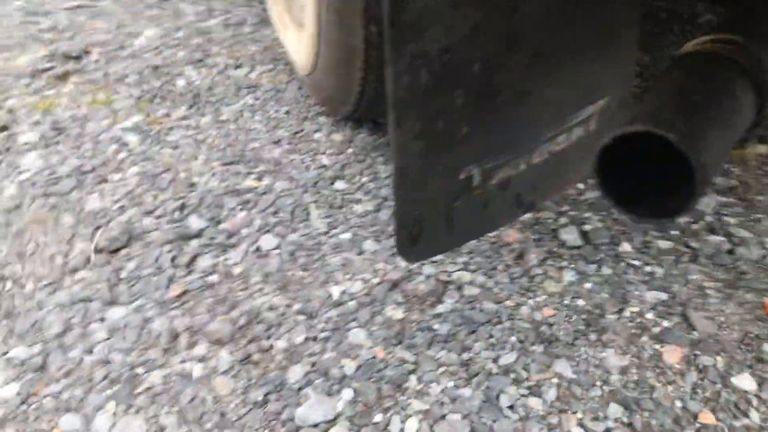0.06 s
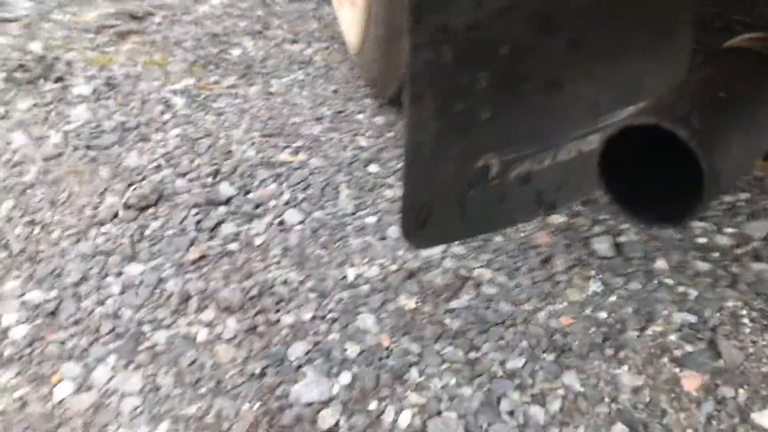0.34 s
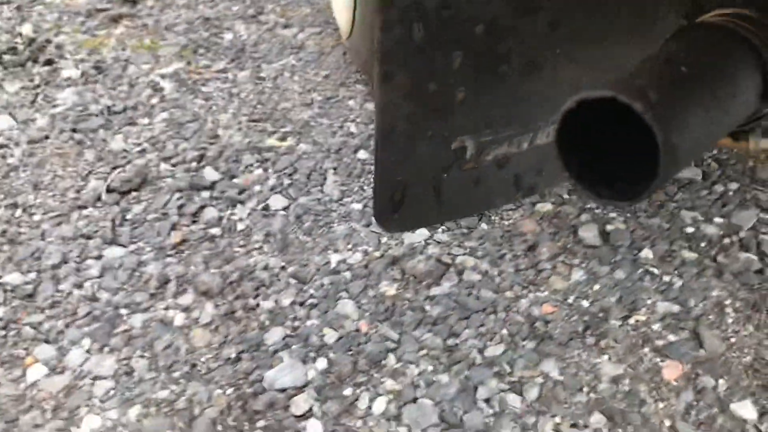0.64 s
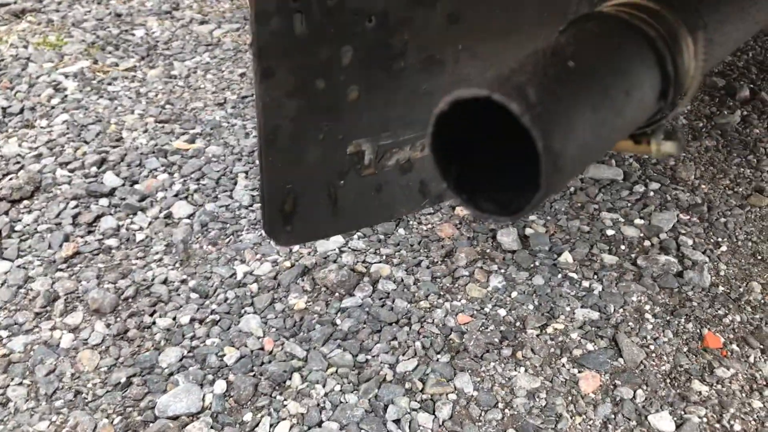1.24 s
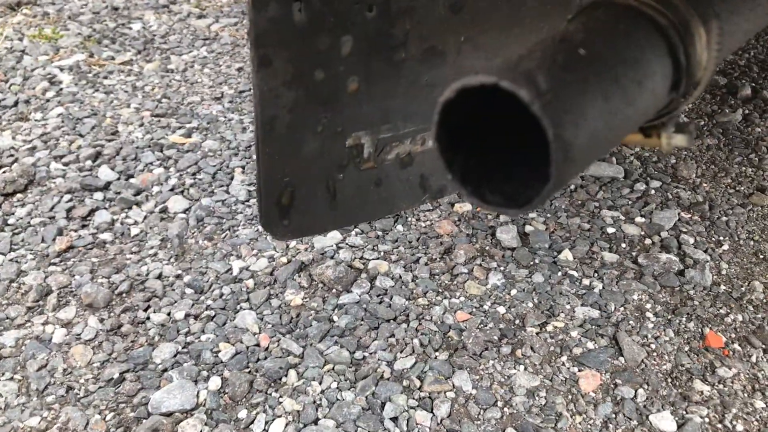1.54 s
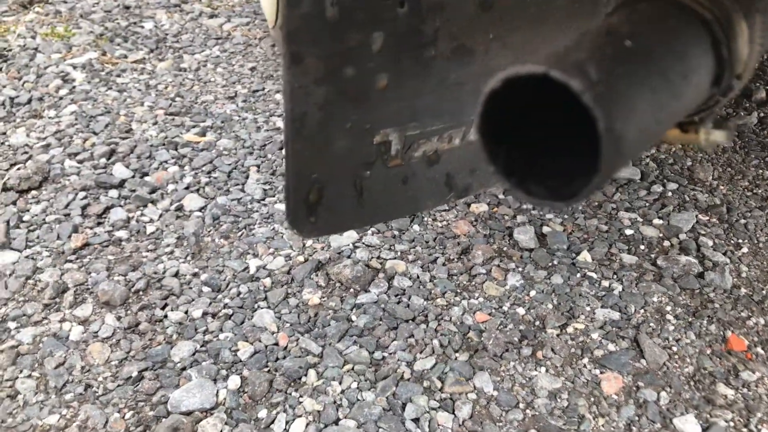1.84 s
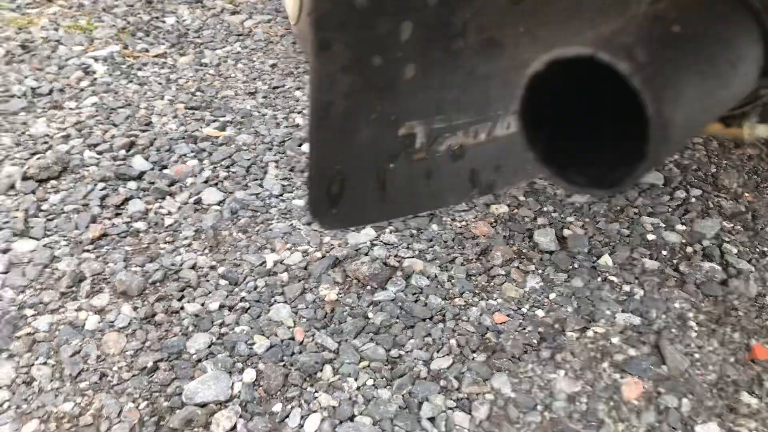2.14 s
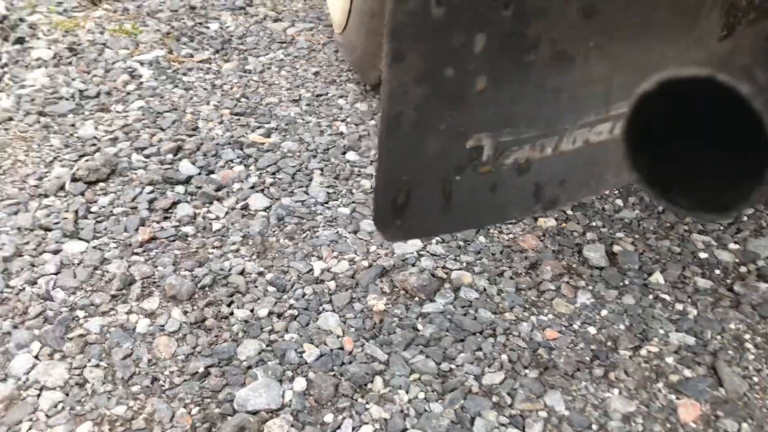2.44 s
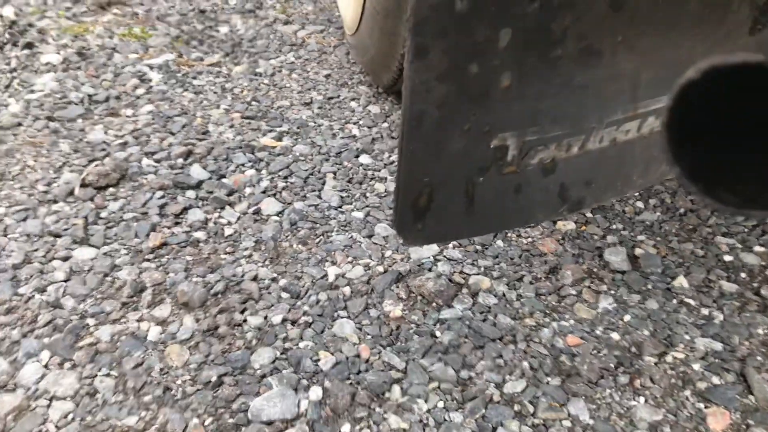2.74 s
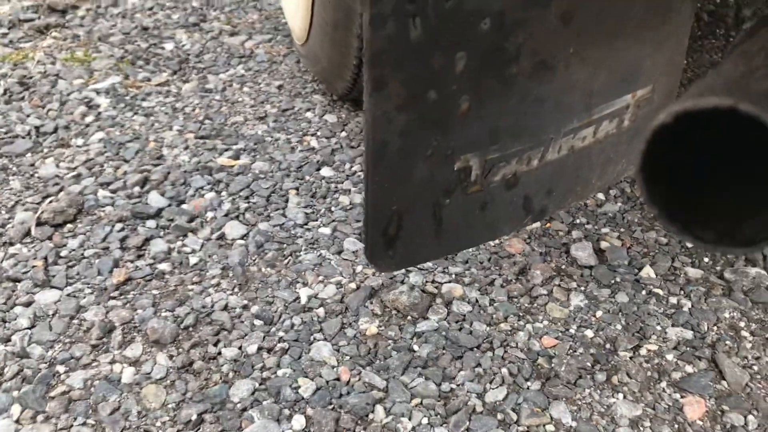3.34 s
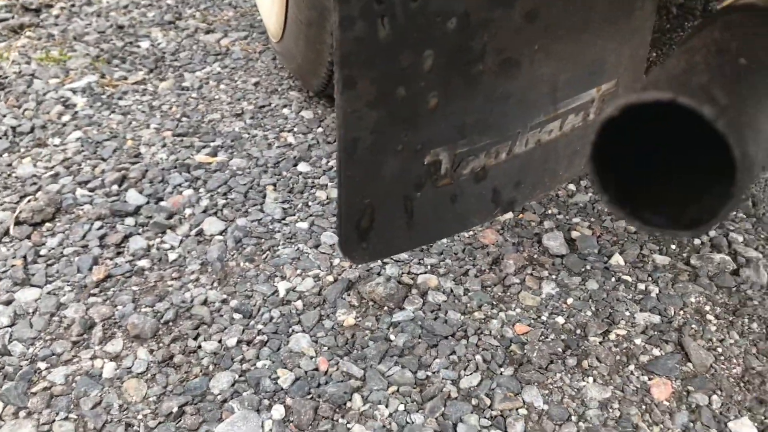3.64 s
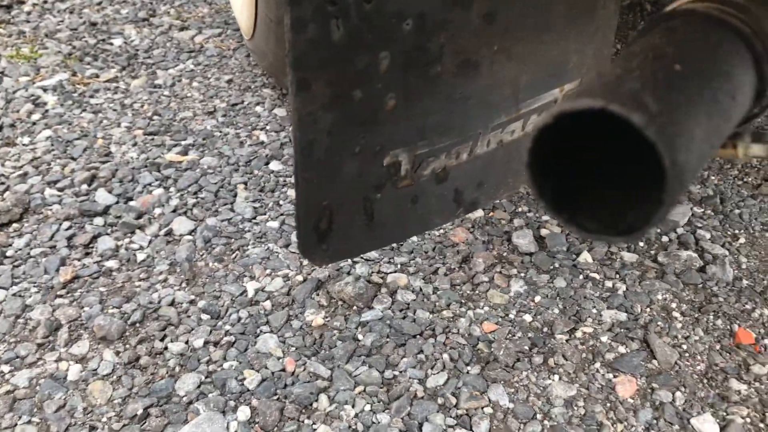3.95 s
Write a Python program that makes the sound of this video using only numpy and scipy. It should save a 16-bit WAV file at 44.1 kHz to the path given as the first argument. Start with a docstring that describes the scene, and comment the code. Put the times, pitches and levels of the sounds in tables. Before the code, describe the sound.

Uneven popping from an idling two-stroke car exhaust, close and dry in the open air. Spluttering gas blows on the microphone for about a second, then sharper cracks ring the pipe with deep thumps, a low drone and light hiss.

```python
"""Two-stroke idle at the tailpipe

Outdoors, the microphone a hand's width from the tailpipe of a small, unevenly idling two-stroke car.
For the first second or so it sits in the exhaust stream, which buffets it and splutters.
Each firing cracks and rings the pipe; once clear of the stream, puffs of gas thump the microphone
just after the firings. In between, the silencer drones over a background hiss."""
import sys
import numpy as np
from scipy.fft import rfft, irfft, next_fast_len
from scipy.io import wavfile
from scipy.ndimage import uniform_filter1d, map_coordinates

SR = 44100
rng = np.random.default_rng(int(sys.argv[2]) if len(sys.argv) > 2 else 0)


def put_to_file(sound):
    """Save the sound as 16-bit audio at rate SR, in the file named by the first command-line argument."""
    columns = np.atleast_2d(sound).T  # one column per channel
    safe = np.clip(columns, -1, 1)
    whole_steps = np.round(safe * 32767)
    wavfile.write(sys.argv[1], SR, whole_steps.astype(np.int16))


N = 176400

# tailpipe resonances (frequency [Hz], width [Hz], gain [dB])
PIPE_MODES = [(303, 22, -3), (450, 30, -3), (505, 25, -1), (616, 32, 2), (792, 30, -11), (948, 50, 3),
              (1082, 34, 6), (1245, 38, -2), (1396, 32, -2), (1556, 34, -2), (1705, 32, -3),
              (2630, 140, -7), (2950, 80, -11), (4020, 70, -6), (4360, 90, -6)]
PIPE_TOP_HZ, SILENCER_TOP_HZ = 1750, 260  # each is muffled above this


def amp(db):
    """Decibels to amplitude."""
    return 10 ** (np.asarray(db) / 20)


def unit(x):
    """x scaled to rms 1."""
    return x / np.sqrt(np.mean(x ** 2) + 1e-20)


def curve(rows):
    """One value per sample from (time [s], value) rows."""
    return np.interp(np.arange(N) / SR, *np.transpose(rows))


def wobble(rate):
    """A smooth random curve, rate knots a second."""
    return map_coordinates(rng.standard_normal(4096), [np.arange(N) * rate / SR], mode="wrap")


def grid():
    """Frequencies [Hz] at which filter responses are given."""
    return np.fft.rfftfreq(2 * next_fast_len(N // 2 + SR // 4), 1 / SR)


def filtered(x, response):
    """x through a response on the frequency grid."""
    return irfft(rfft(x, 2 * len(response) - 2) * response)[:N]


def colour(points):
    """Causal response of unit power, shaped by (frequency [Hz], gain [dB]) points."""
    hz, db = np.transpose(points)
    gain = amp(np.interp(np.log(grid() + 1), np.log(hz), db))
    cepstrum = irfft(np.log(gain))
    half = len(cepstrum) // 2
    h = np.exp(rfft(np.r_[cepstrum[0], 2 * cepstrum[1:half]], len(cepstrum)))  # minimum phase
    return h / np.sqrt(np.mean(abs(h) ** 2))


def resonances(modes, top_hz):
    """Unit-power response of (frequency [Hz], width [Hz], gain [dB]) modes, muffled above top_hz."""
    f = grid()
    h = sum(amp(db) * 1j * f * width / (hz * hz - f * f + 1j * f * width) for hz, width, db in modes)
    h = h / (1 + np.sqrt(2) * 1j * f / top_hz - (f / top_hz) ** 2)
    return h / np.sqrt(np.mean(abs(h) ** 2))


def noise(response):
    """Noise of rms 1 with that response."""
    return unit(filtered(rng.standard_normal(N), response))


def even(x):
    """A narrow-band rumble at rms 1, its chance swells partly evened out."""
    power = np.abs(uniform_filter1d(x * x, size=1800)) + 1e-9
    return unit(x / power ** 0.16)


def add(track, start_s, x):
    """Mix x into the track at start_s."""
    part = track[max(round(start_s * SR), 0):][:len(x)]
    part += x[:len(part)]


def exhaust_stream(clear_s=1.242, fade_s=0.023):
    """The stream buffets the microphone until clear_s, and splutters more the harder it blows."""
    # strength of the stream at the microphone (time [s], level [dB])
    strength = [(0, -19), (.04, -16), (.09, -12), (.125, -15), (.17, -10), (.21, -15), (.26, -18),
                (.32, -16), (.36, -18), (.45, -12), (.51, -18), (.582, -16), (.65, -22), (.70, -19),
                (.79, -21), (.86, -17), (.92, -21), (.95, -27), (1.2, -30)]
    # spectrum of the low buffeting (frequency [Hz], gain [dB])
    buffet_spectrum = [(20, -15), (55, 5), (100, 1.5), (200, -1), (450, -4), (900, -14), (1500, -31),
                       (3000, -64), (6000, -65)]
    # spectrum of the splutter (frequency [Hz], gain [dB])
    splutter_spectrum = [(100, -10), (500, 10), (1100, 8), (2200, -1.5), (3500, -12.5), (5000, -23),
                         (8000, -36), (16000, -67)]
    # the sharpest eddies, heard as spits (time [s], level [dB])
    spits = [(.029, -15), (.043, -11), (.107, -7), (.133, -13), (.153, -12), (.169, -9), (.180, -11),
             (.306, -15), (.317, -14), (.369, -17), (.397, -14), (.415, -15), (.434, -8), (.474, -11),
             (.573, -14), (.586, -15), (.614, -19), (.692, -19), (.744, -15), (.763, -18), (.815, -16),
             (.858, -16), (.902, -19), (.917, -19)]
    strength_db, t = curve(strength), np.arange(N) / SR
    peak_db = strength_db.max()
    eddy = wobble(260)
    gusts = unit(amp(2.5 * eddy)) * rng.standard_normal(N)
    buffet = filtered(gusts, colour(buffet_spectrum)) * amp(strength_db + 1.5)
    splutter_db = peak_db - 7.5 + 1.56 * (strength_db - peak_db)
    spray = unit(amp(4.8 * (eddy + wobble(900)))) * amp(splutter_db)
    spit = np.exp(-t[:SR // 20] / 0.002)
    for start_s, db in spits:
        add(spray, start_s, amp(db + 3) * spit)
    splutter = filtered(spray * rng.standard_normal(N), colour(splutter_spectrum))
    return (buffet + splutter) * np.clip((clear_s - t) / fade_s, 0, 1)


def silencer_drone(strokes):
    """The strokes pump the silencer, which drones at its low resonances."""
    # silencer resonances (frequency [Hz], width [Hz], gain [dB])
    modes = [(56, 24, -1), (78, 26, 0), (102, 22, -2), (150, 30, -8), (235, 50, -17)]
    # loudness of the drone (time [s], level [dB])
    level = [(0, -29.5), (1.0, -20), (1.16, -20), (1.23, -36), (1.33, -21.5), (1.45, -24), (2.0, -19),
             (2.5, -21.5), (2.65, -19.5), (2.97, -33), (3.08, -22.5), (3.24, -23.5), (3.5, -16),
             (3.66, -33), (4, -6)]
    return amp(curve(level)) * even(filtered(strokes, resonances(modes, SILENCER_TOP_HZ)))


def pipe_boom(strokes, hz=170, width_hz=24):
    """The strokes set the pipe's lowest mode booming."""
    # loudness of the boom (time [s], level [dB])
    level = [(0, -34.5), (1.0, -35.5), (1.28, -32), (1.45, -26), (1.65, -31.5), (2.1, -39), (2.33, -24),
             (2.52, -18), (2.66, -32.5), (2.97, -35), (3.12, -39), (3.4, -59), (3.7, -31), (3.79, -17.5),
             (3.88, -32), (4, -50)]
    mode = resonances([(hz, width_hz, 0)], SILENCER_TOP_HZ)
    return amp(curve(level)) * even(filtered(strokes, mode))


def gas_flow(pulsing, top_hz=556):
    """Slow, pulsing gas rings mostly the pipe's lower modes."""
    # gas flowing through the pipe (time [s], level [dB])
    level = [(0, -59.5), (.95, -49.5), (1.14, -35.5), (1.27, -35.5), (1.42, -32), (1.65, -31.5), (2.0, -25),
             (2.45, -46), (2.62, -26), (2.87, -45), (2.97, -31), (3.12, -25.5), (3.22, -31), (3.53, -26),
             (3.7, -24), (4, -30)]
    pipe = resonances(PIPE_MODES, PIPE_TOP_HZ) / (1 + 1j * grid() / top_hz)
    return amp(curve(level) - 5) * unit(filtered(pulsing * rng.standard_normal(N), pipe))


def background_hiss(pulsing):
    """A hiss behind the engine, pulsing with the strokes."""
    # the hiss as heard, ducked during the buffeting and after loud thumps (time [s], level [dB])
    heard_level = [(0, -65), (1.0, -48), (1.27, -44.5), (1.6, -40.5), (2.0, -38.5), (2.4, -37),
                   (2.65, -37.5), (2.8, -39.5), (2.98, -40.5), (3.2, -39), (3.5, -41), (3.7, -37), (4, -35)]
    # spectrum of the hiss (frequency [Hz], gain [dB])
    spectrum = [(100, -6), (450, 18), (800, -13), (1600, -36), (2100, 0), (2700, -1), (3400, -4.5),
                (4300, -6.5), (5500, -11.5), (8000, -16), (10500, -20.5), (16000, -22)]
    return amp(curve(heard_level)) * pulsing * noise(colour(spectrum))


def unfired_strokes(strokes_per_s=52, rate_scatter=0.14, level_scatter_db=6, pulse_depth=0.25):
    """Strokes that fail to fire pump the silencer and push pulsing gas through the pipe."""
    phase = np.cumsum(strokes_per_s * (1 + rate_scatter * wobble(25))) / SR
    kicks = np.diff(np.floor(phase), prepend=0) * amp(level_scatter_db * rng.standard_normal(N))
    strokes = unit(kicks) + rng.standard_normal(N)
    pulsing = unit(1 + pulse_depth * np.cos(2 * np.pi * phase))
    return silencer_drone(strokes) + pipe_boom(strokes) + gas_flow(pulsing) + background_hiss(pulsing)


def firings(crack_db=-19, ring_db=21, echo_s=0.0064, echo_db=-9):
    """Each firing is a shock, its echo and a rough burn: they crack at the outlet and ring the pipe."""
    # firings (time [s], level [dB], extra treble [dB], burn decay [s])
    pops = [(0.067, -13.5, -7, 0.021), (0.209, -11.5, -11, 0.0048), (.225, -10, -10.5, 0.0027),
            (0.282, -21, -15, 0.011), (0.423, -29, 11, 0.009), (0.444, -11, -1, 0.014),
            (0.504, -19, -7, 0.0043), (0.604, -23, -11, 0.0049), (0.662, -22, 7, 0.012),
            (.803, -35, 9, 0.012), (.823, -18.5, -4, 0.0069), (0.965, -22.5, -3, 0.018),
            (0.982, -33, 10.5, 0.018), (1.103, -28, -4, 0.0037), (1.124, -34.5, 1, .01),
            (1.185, -18, 1, 0.013), (1.347, -15.5, 2.5, 0.014), (1.446, -31.5, 6.5, 0.0076),
            (1.488, -20, -6, 0.009), (1.549, -14, 2, 0.015), (1.693, -19, -4.5, 0.0083),
            (1.7545, -13, 9, 0.013), (1.76, -34, 16, 0.012), (1.857, -17, 1, 0.019), (1.9395, -22, 3, .01),
            (1.959, -22, 0, .01), (2.043, -30, 0, .01), (2.061, -23, 0, .012), (2.103, -26, 0, .01),
            (2.164, -21, 0, .012), (2.266, -11, -1, .009), (2.329, -21, -1, 0.022),
            (2.390, -20, 5.5, 0.016), (2.432, -26.5, 1.5, 0.029), (2.4934, -15.5, 0, 0.016),
            (2.557, -32.5, 9, 0.013), (2.597, -16.5, -4, 0.0072), (2.6596, -15, 1.5, 0.018),
            (2.7217, -11, 5.5, 0.014), (2.8247, -18, 4, 0.017), (2.888, -11, 7, 0.016),
            (3.030, -27, 8, 0.013), (3.050, -26, 7.5, 0.015), (3.092, -20, -10, 0.018),
            (3.113, -34, 10, 0.021), (3.2544, -11, 4.5, 0.017), (3.375, -21, 3.5, .012),
            (3.4367, -13.5, -1, 0.0088), (3.455, -16.5, 3, 0.013), (3.595, -12.5, 0.5, 0.016),
            (3.7539, -12.5, -6, 0.013), (3.774, -15.5, -0.5, 0.011), (3.912, -8.5, -1.5, 0.018),
            (3.931, -24, 14, 0.013), (3.972, -19, -6, .012)]
    # spectrum of the crack at the outlet (frequency [Hz], gain [dB])
    crack_spectrum = [(150, -25), (500, -11), (780, -15), (1100, -2), (1650, -3), (1950, -13), (2300, -13),
                      (2700, -5), (3150, -9), (3650, -11), (4000, -5), (4400, -5), (4800, -12), (5900, -12),
                      (6250, -17), (6800, -9), (7250, -16), (7900, -8), (8800, -16), (9600, -15),
                      (10200, -23), (11400, -20), (16000, -28)]
    shock_rise_s, burn_rise_s = 0.0007, 0.0014
    crack, pipe_drive, t = np.zeros(N), np.zeros(N), np.arange(SR // 8) / SR
    shock = lambda age: np.maximum(age / shock_rise_s, 0) * np.exp(1 - np.abs(age) / shock_rise_s)
    front = shock(t) + amp(echo_db) * shock(t - echo_s)
    for start_s, db, treble_db, decay_s in pops:
        burn = np.exp(-t / decay_s) * (1 - np.exp(-t / burn_rise_s))
        hardness = amp(0.57 * max(db + 25, 0))  # firings above -25 dB start with an ever harder shock
        crack_noise, burn_noise = rng.standard_normal((2, len(t)))
        add(crack, start_s, amp(db + treble_db) * crack_noise * (hardness * front + burn))
        add(pipe_drive, start_s, amp(db + ring_db) * ((t == 0) + amp(-20) * burn_noise * burn))
    flicker = amp(1.5 * wobble(490))
    crack = filtered(crack * flicker, colour(crack_spectrum))
    ring = filtered(pipe_drive, resonances(PIPE_MODES, PIPE_TOP_HZ))
    return amp(crack_db) * crack + ring


def gas_puffs(half_cycles=0.91, slowing=0.73):
    """Rings of gas pass the microphone: suction, then pressure, slowing as they go, eddies inside."""
    # puffs at the microphone (time [s], level [dB], pitch at mid-puff [Hz], turbulence [dB])
    puffs = [(1.132, -10.5, 90, -10), (1.189, -5.5, 113.4, -18.5), (1.372, -7, 78, -23),
             (1.5715, -1.5, 82.5, -28), (1.776, -1.5, 80, -24), (1.88, -8.5, 113, -33),
             (1.971, -6.5, 81, -21), (2.065, -1, 92.6, -23), (2.187, 0.5, 94, -24), (2.283, -4, 120, -8),
             (2.555, -6, 152, -6), (2.612, -5.5, 89, -16), (2.626, -14, 77.4, -30.5), (2.644, -36, 131, -5),
             (2.687, 4, 102.6, -30), (2.7503, -0.5, 93.5, -24), (2.777, -10.5, 127, -11.5),
             (2.798, -20, 127, -0.5), (2.843, 1, 108, -17.5), (2.9137, -0.5, 108.3, -11.5),
             (3.2795, -1, 95, -19.5), (3.29, -17, 91, -4.5), (3.394, -9.5, 83.5, -12),
             (3.460, -8, 113, -9.5), (3.523, -10, 70, -28), (3.619, -4, 124, -10),
             (3.9338, -3.5, 92.6, -10.5), (3.982, -35, 80, 11)]
    # spectrum of the eddies (frequency [Hz], gain [dB])
    eddy_spectrum = [(60, -10), (200, 0), (530, -4), (1200, -24), (4000, -60)]
    pressure, eddies, t = np.zeros(N), np.zeros(N), np.arange(-SR // 20, SR // 20) / SR
    for centre_s, db, hz, turbulence_db in puffs:
        # the pitch falls as exp(-slowing * cycles)
        cycles = np.log(np.maximum(1 + slowing * hz * t, 1e-3)) / slowing
        swell = amp(db) * np.exp(-(cycles / half_cycles) ** 2)
        add(pressure, centre_s + t[0], swell * np.sin(2 * np.pi * cycles))
        add(eddies, centre_s + t[0], swell * amp(turbulence_db))
    return pressure + eddies * noise(colour(eddy_spectrum))


def scene():
    """All sources at one microphone, close and dry in the open air."""
    return (firings() + gas_puffs() + unfired_strokes() + exhaust_stream())[None]


def record(dry):
    """The microphone chain sheds the deepest bass, rounds off the largest peaks and cuts the very top."""
    low_cut_hz, top_hz, ceiling = 38, 16000, 0.96
    f = grid()
    x = filtered(dry[0], f ** 2 / np.hypot(f ** 2, low_cut_hz ** 2))
    rounded = x / (1 + np.abs(x / ceiling) ** 6) ** (1 / 6)
    return filtered(rounded, f < top_hz)[None]


dry = scene()
out = record(dry)
put_to_file(out)
```